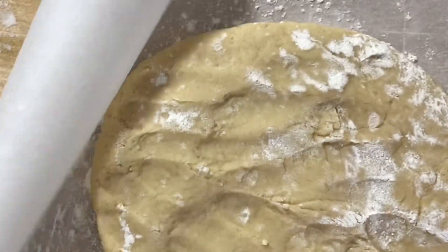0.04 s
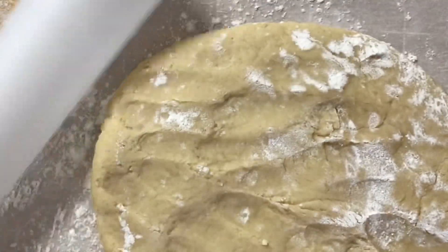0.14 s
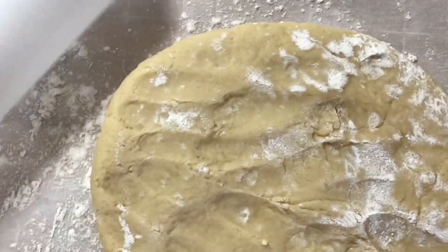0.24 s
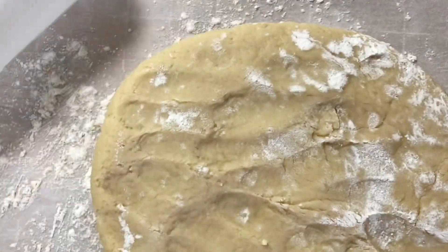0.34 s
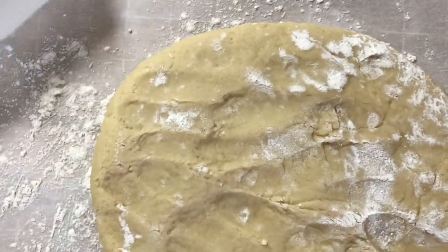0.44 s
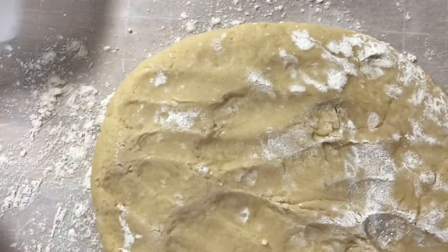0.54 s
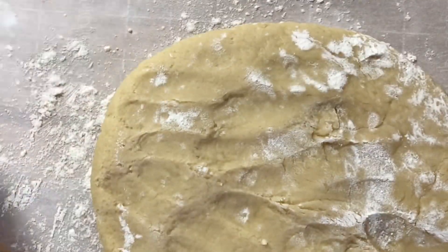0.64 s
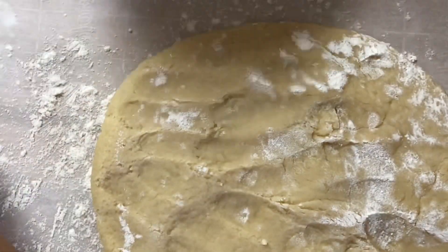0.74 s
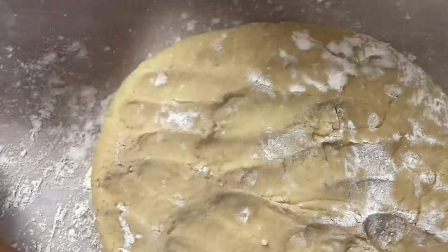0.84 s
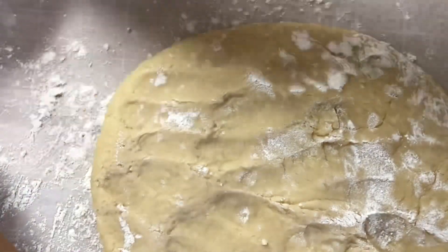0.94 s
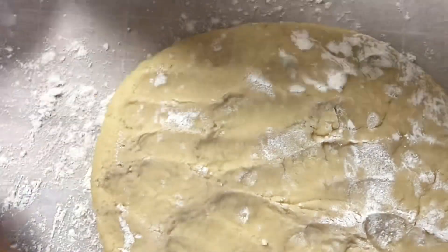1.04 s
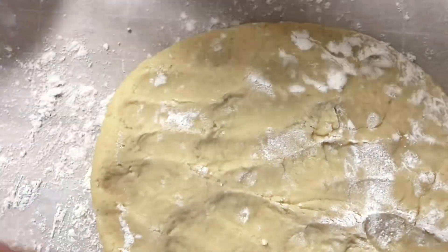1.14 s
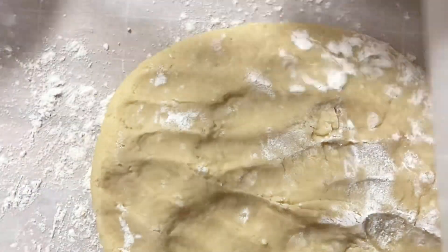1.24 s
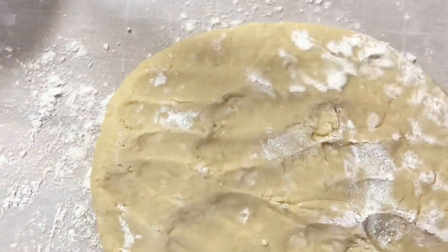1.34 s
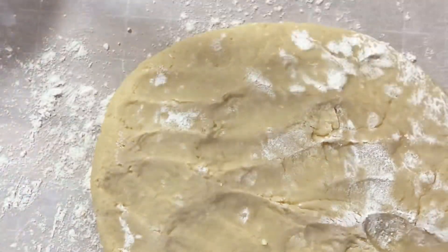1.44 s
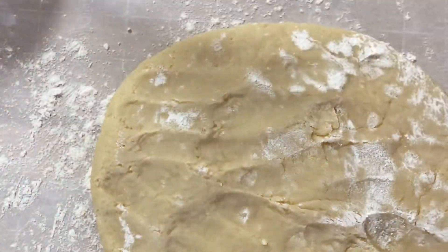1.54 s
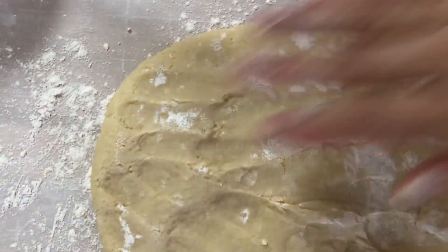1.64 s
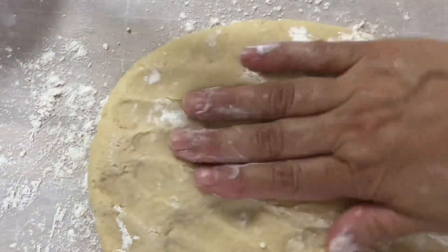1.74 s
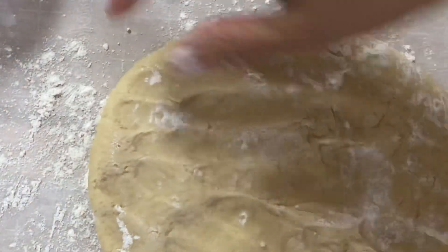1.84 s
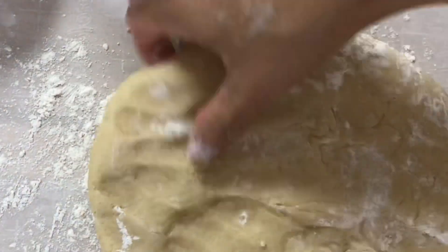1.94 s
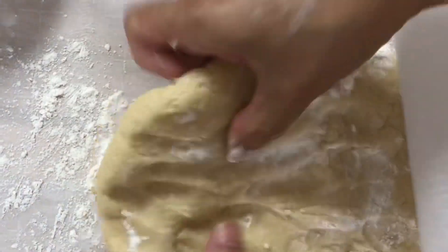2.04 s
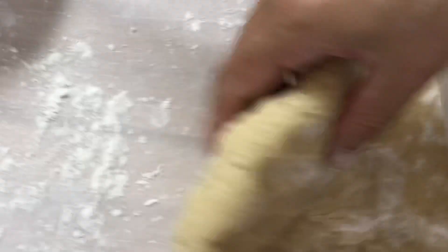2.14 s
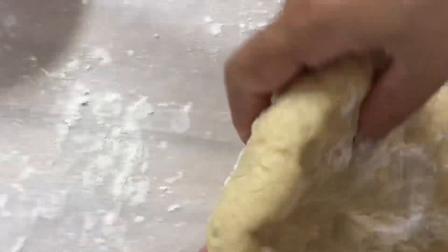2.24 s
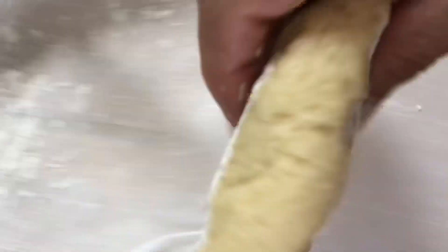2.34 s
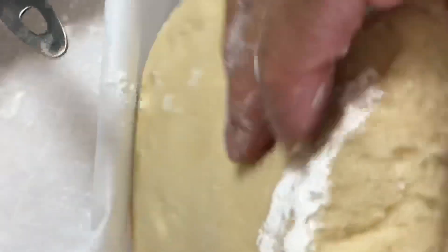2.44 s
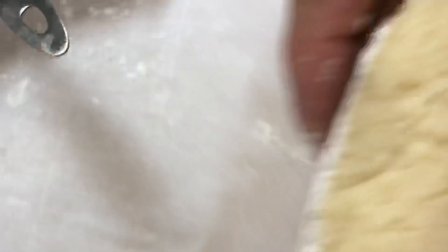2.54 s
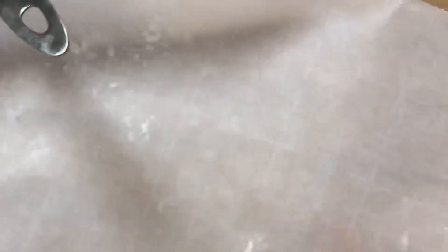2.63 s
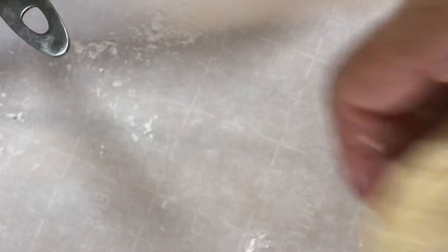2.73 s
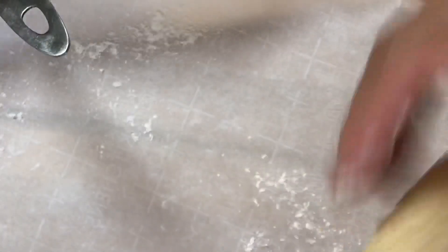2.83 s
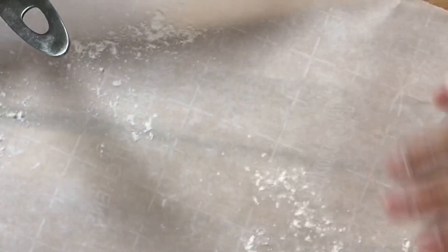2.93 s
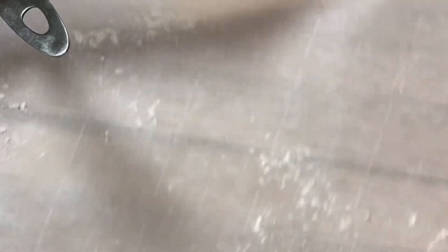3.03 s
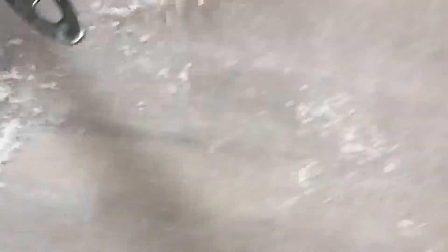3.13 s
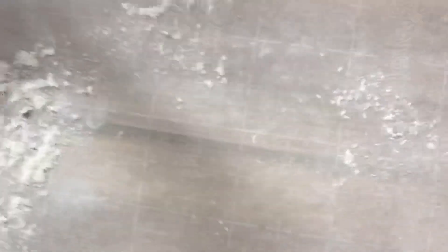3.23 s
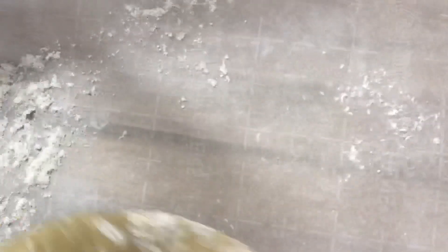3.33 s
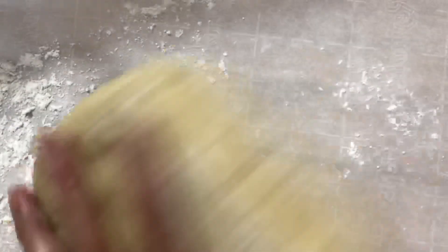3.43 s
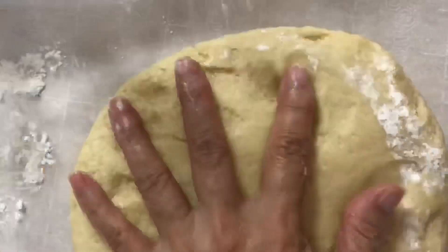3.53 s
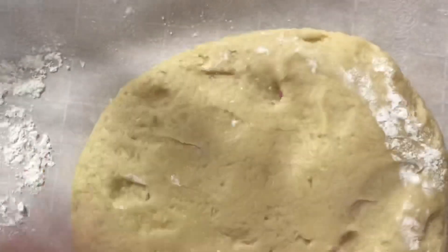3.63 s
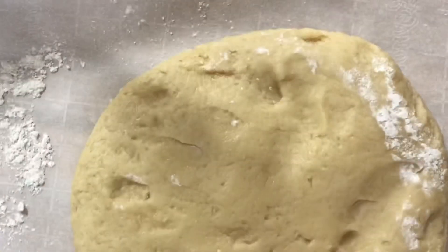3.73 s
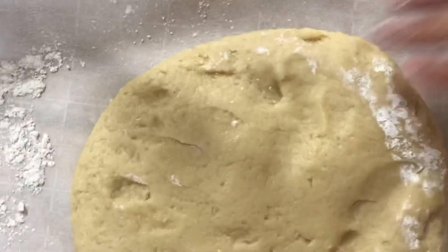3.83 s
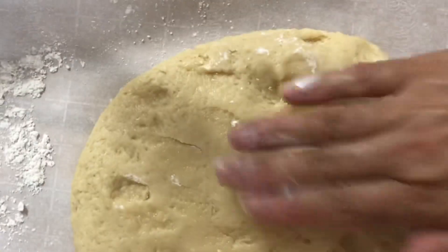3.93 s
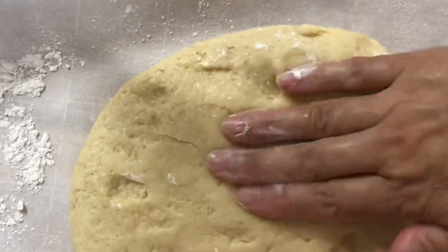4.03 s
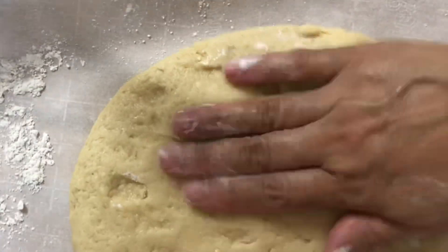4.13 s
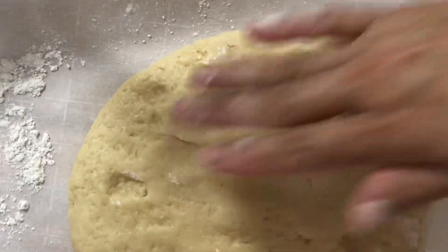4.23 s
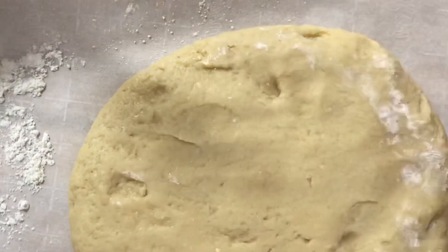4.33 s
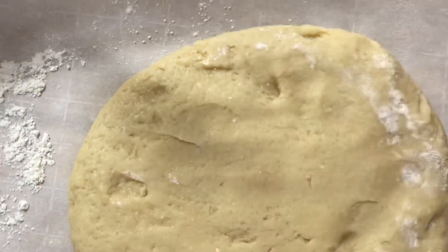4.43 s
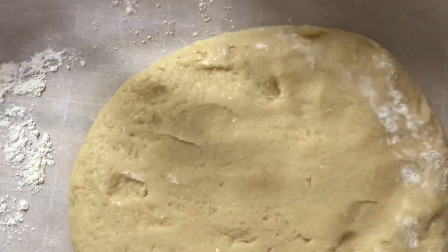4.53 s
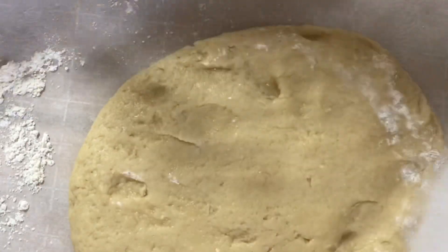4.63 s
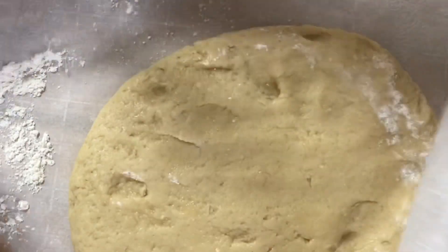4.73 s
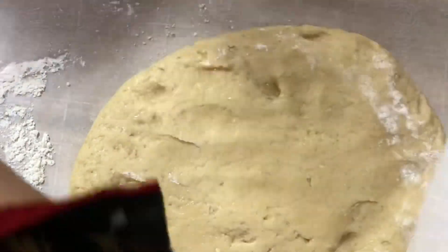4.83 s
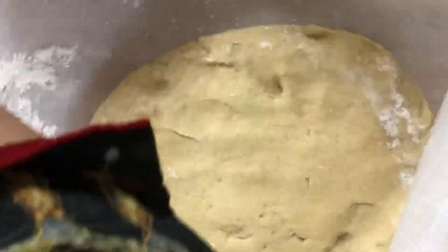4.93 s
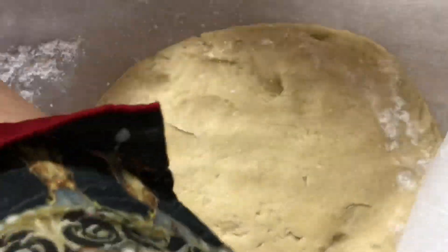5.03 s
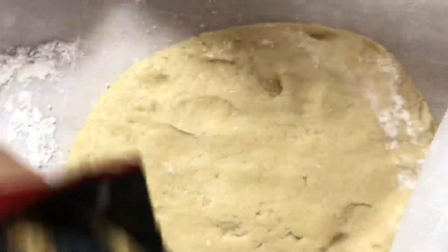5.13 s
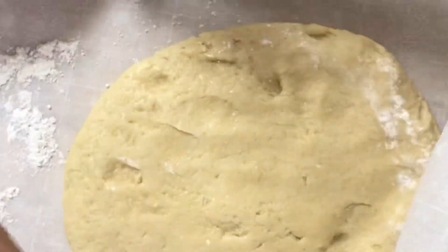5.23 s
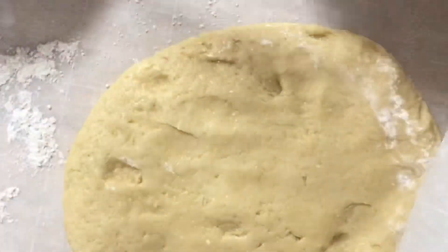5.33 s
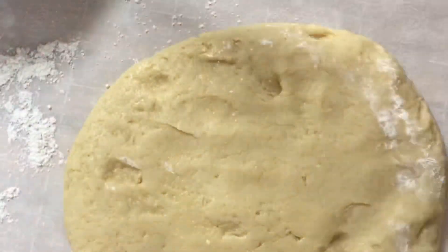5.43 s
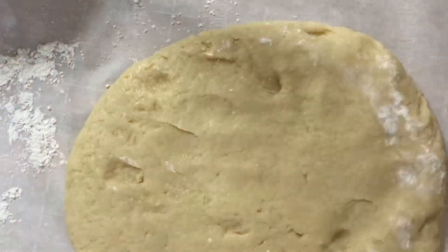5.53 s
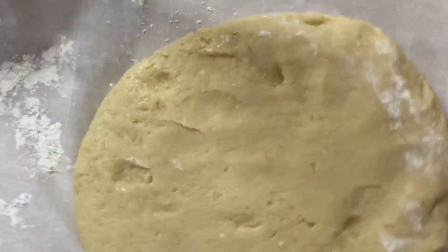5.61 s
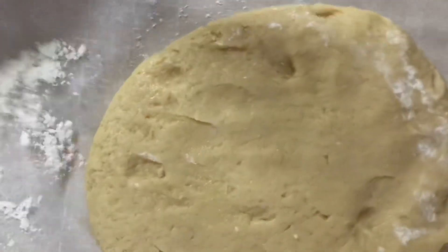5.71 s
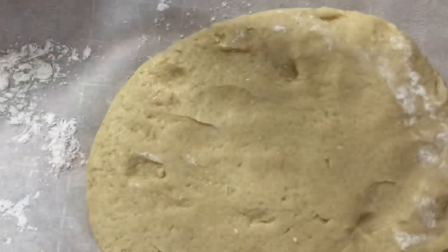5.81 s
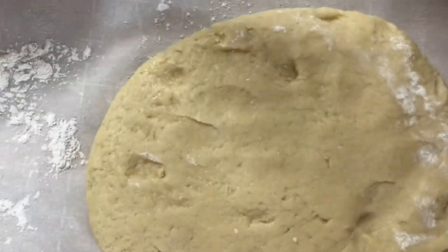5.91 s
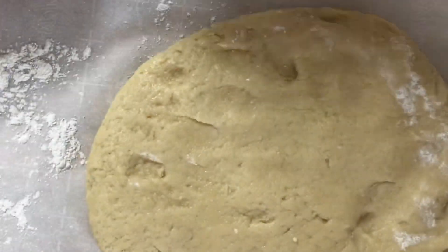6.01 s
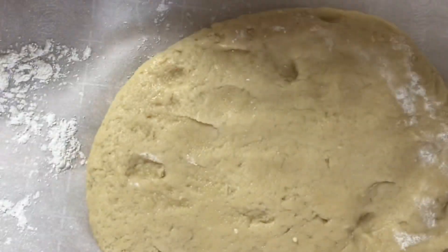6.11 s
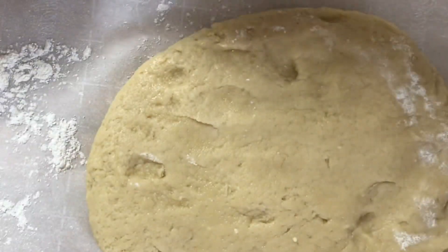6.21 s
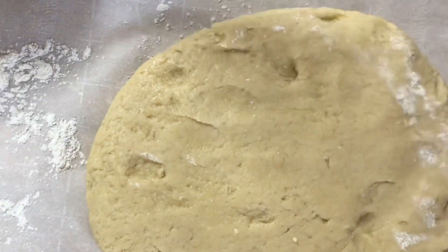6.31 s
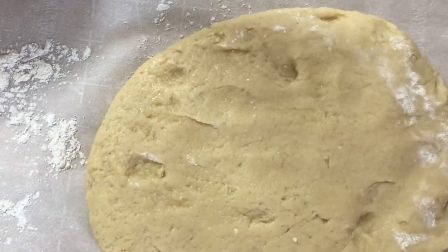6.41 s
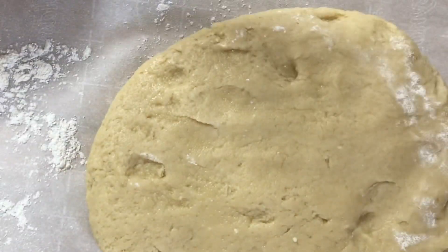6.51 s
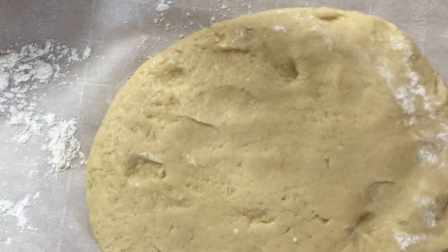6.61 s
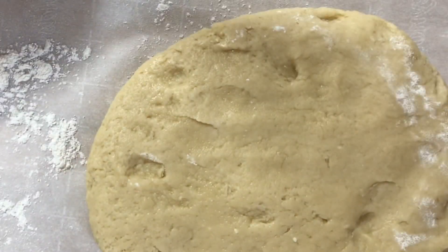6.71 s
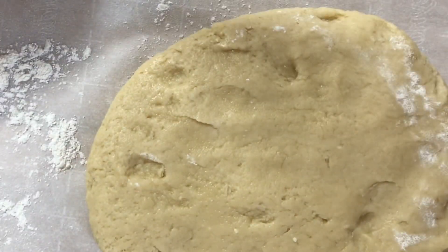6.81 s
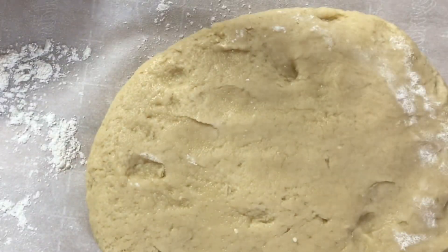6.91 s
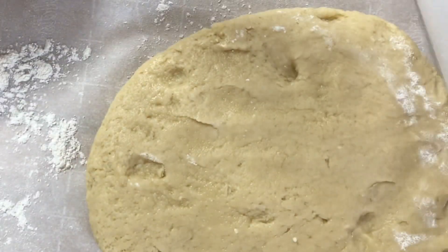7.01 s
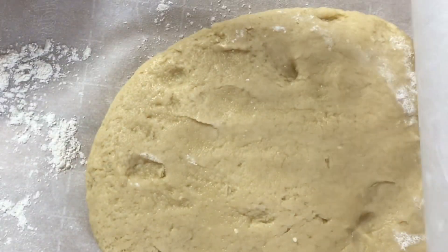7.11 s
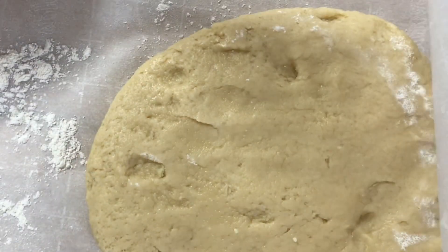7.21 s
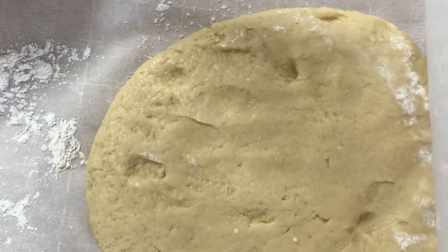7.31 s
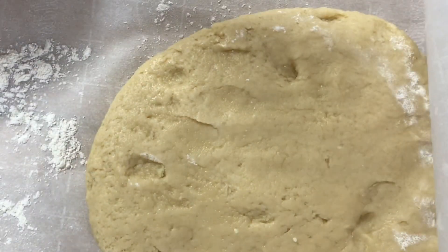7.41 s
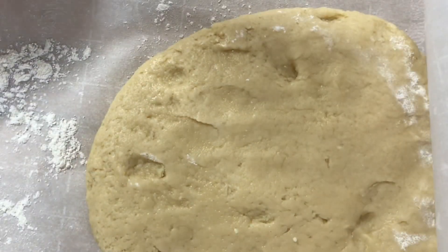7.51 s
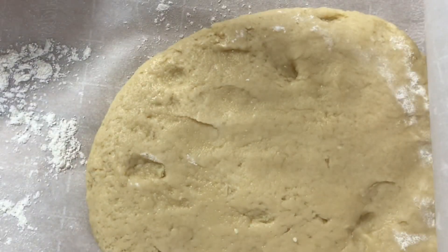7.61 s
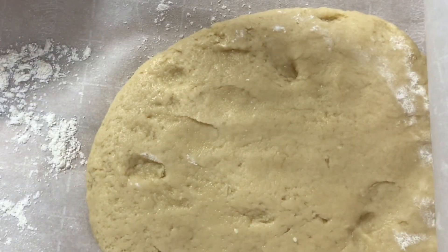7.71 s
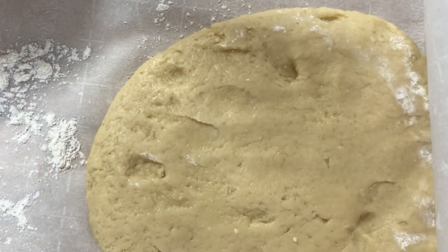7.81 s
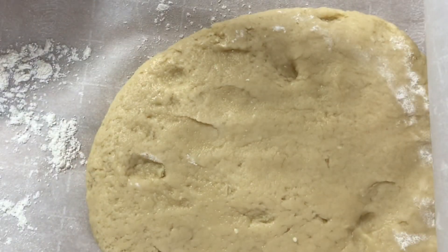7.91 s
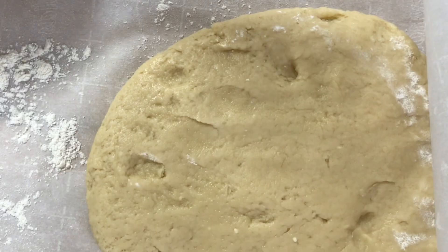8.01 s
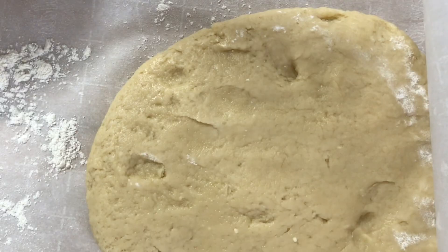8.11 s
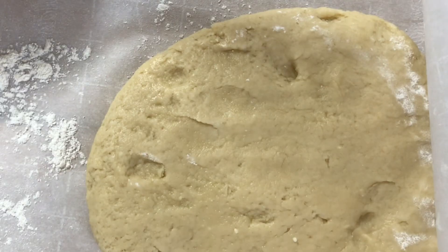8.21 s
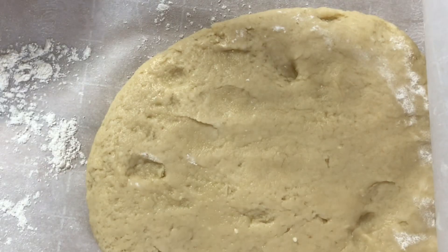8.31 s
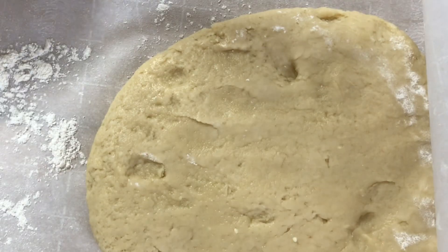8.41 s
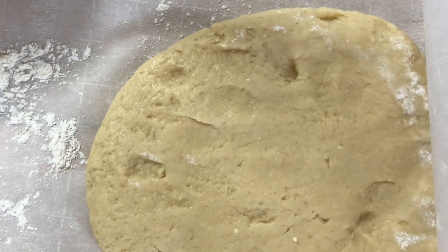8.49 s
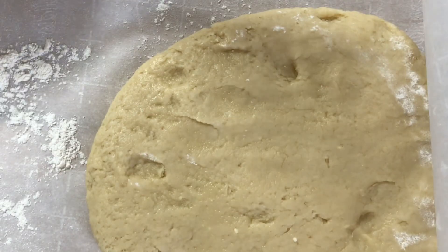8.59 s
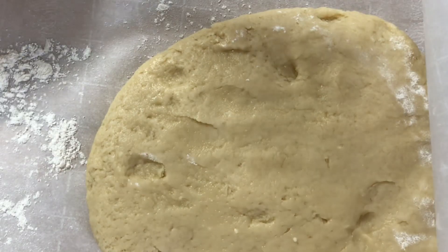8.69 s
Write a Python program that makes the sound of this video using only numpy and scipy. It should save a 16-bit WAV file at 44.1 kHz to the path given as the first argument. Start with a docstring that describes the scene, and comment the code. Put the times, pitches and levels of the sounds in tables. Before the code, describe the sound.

A close, dry kitchen scene over steady low fridge hum and airy wash. It opens with a soft hiss of a hand wiping flour, repeated near 0.5 s, with small paper ticks. At 0.9 s a hard, woody knock of a rolling pin on the worktop sets a thin metal cutter rattling brightly for an instant. Baking paper rustles from 1.2 s, with light bumps near 1.6 s, a floury wipe around 2 s, and the strongest crackling from 2.2 to 3.1 s as dough is lifted. At 3.5 s the dough slaps down with a sharp, crackly bang. Soft pats near 4.1 s and dense crinkles lead to another hard knock at 5.1 s. Paper snaps continue to about 6 s, then thin out with faint wipes at 6.4 and 7 s. Weak taps cluster at 7.7-7.9 s, then near quiet. A distant drone sinks and vanishes by 3.4 s.

```python
"""A kitchen worktop: a slab of dough is lifted, turned and slapped down on a crackling sheet of baking paper.
The paper is noise in three ranges, shaped by drags and pops, with short clusters of ticks for snapping creases.
Blows and a rattling metal cutter are sums of damped modes with noise; a hand wiping flour is band-passed noise.
Behind are a fridge (hum lines and shaped air noise), a sinking drone, perhaps a vehicle outside, and a rumble.
A phone listens close by: it rounds the peaks and limits the band."""
import sys
import numpy as np
from scipy import signal
from scipy.fft import rfft, irfft
from scipy.io import wavfile
from scipy.ndimage import uniform_filter1d

SR = 44100
rng = np.random.default_rng(int(sys.argv[2]) if len(sys.argv) > 2 else 0)


def generate_wav(signal):
    """Clip the signal to [-1, 1] and save it as 16-bit WAV at the path in sys.argv[1]."""
    frames = np.transpose(np.atleast_2d(signal))
    scaled = np.clip(frames, -1, 1) * 32767
    pcm = np.round(scaled).astype(np.int16)
    wavfile.write(sys.argv[1], SR, pcm)


N = 385875


def undb(db):
    """Decibels to amplitude: 20 dB is a factor of ten."""
    return 10 ** (np.asarray(db) / 20)


def level(x, db):
    """Scale a signal to a given rms level, the root of its mean power."""
    return x * undb(db) / np.sqrt(np.mean(x ** 2))


def band(x, lo_hz, hi_hz, order=2):
    """Band-pass filtering: a Butterworth response, flat between its edges."""
    edges_hz = [lo_hz, min(hi_hz, .49 * SR)]
    return signal.sosfilt(signal.butter(order, edges_hz, "bandpass", fs=SR, output="sos"), x)


def curves(table):
    """Linear interpolation in time of every column after the first, start_s."""
    s, *columns = np.transpose(np.vstack(table))
    return [np.interp(np.arange(N) / SR, s, c) for c in columns]


def add(out, s, x):
    """Superposition: sound x is summed into out from second s."""
    i = int(s * SR)
    out[i:i + len(x)] += x[:N - i]


def fade(t, t60):
    """Exponential decay that loses 60 dB in t60 seconds."""
    return np.exp(-np.log(1000) * t / t60)


def walk(rate):
    """Random modulation: straight slopes between random levels, rate of them per second; spread about 0.7."""
    k = int(SR / rate)
    held = np.repeat(rng.standard_normal(N // k + 1), k)
    return 0.9 * uniform_filter1d(held, k)[:N]


def ring(modes, t, stretch, chance):
    """Modal synthesis: damped sines, each struck a little differently; peak 1."""
    scatter_db, detune = 2, .004
    x = 0
    for (hz, db, t60), c in zip(modes, chance):
        sine = np.sin(2 * np.pi * hz * (1 + detune * c) * t)
        x = x + undb(db + scatter_db * c) * fade(t, stretch * t60) * sine
    return x / np.abs(x).max()


def stroke(s, rise, hold, fall, db):
    """Exponential growth and decay of one movement: its span, time since full strength, and level in dB."""
    ramp_db = 20  # climbed in one rise time, lost in one fall time
    n = slice(max(int((s - 3 * rise) * SR), 0), min(int((s + hold + 3 * fall) * SR), N))
    t = np.arange(n.start, n.stop) / SR - s
    rises_left = np.maximum(-t, 0) / max(rise, .003)
    falls_done = np.maximum(t - hold, 0) / max(fall, .003)
    return n, t, db - ramp_db * (rises_left + falls_done)


def sheet(x):
    """Radiation of paper in three ranges, joined without gaps, each at rms 1; the top end droops."""
    f = np.fft.rfftfreq(N, 1 / SR) + 1
    above = [1 / (1 + (hz / f) ** steep) for hz, steep in ((1600, 2.5), (3300, 4.64), (9000, 2.3))]
    low = np.abs(above[0] - above[1])
    mid = np.abs(above[1] - above[2])
    high = above[2] / (1 + (f / 17000) ** 4)
    return [level(irfft(rfft(x) * share, N), 0) for share in (low, mid, high)]


def patchy(x, depth_db):
    """Shape-dependent radiation: as the sheet changes shape, each narrow range swells and fades on its own."""
    f = np.fft.rfftfreq(N, 1 / SR) + 1
    above = [1] + [1 / (1 + (hz / f) ** 8) for hz in np.geomspace(1500, 13000, num=12)] + [0]
    spectrum = rfft(x)
    return sum(irfft(spectrum * (a - b), N) * undb(depth_db * walk(11)) for a, b in zip(above, above[1:]))


def drags():
    """Incoherent addition: overlapping drags add in power; returns the strength of the three paper ranges."""
    # the sheet is dragged or bent: full_from_s, rise_s, hold_s, fall_s, level_db,
    # low_db, high_db (below about 3.3 kHz and above 9 kHz, relative to the middle range)
    drag_table = [(0.226, 0.028, 0.0059, 0.058, -37.5, -14, -4), (0.814, 0.064, 0.05, .03, -47, -9, -6),
                  (0.97, 0.056, 0.36, 0.12, -57, 4.5, -1.5), (1.234, 0.086, 0.19, 0.16, -35, -5, -1.5),
                  (1.608, 0.023, 0.056, 0.037, -36, -6, -16), (1.697, .02, 0.063, 0.099, -44, -4.5, -12),
                  (1.87, .02, 0.31, 0.065, -48, -8, 5), (2.261, 0.084, 0.011, 0.21, -26, -4, -1),
                  (2.378, 0.039, .005, 0.16, -27.5, -4, -5), (2.498, 0.13, 0.059, 0.033, -29.5, -9, -6),
                  (2.583, 0.011, 0.012, 0.02, -35.5, -2, 7), (2.615, 0.022, .01, 0.22, -49.5, 1, 6),
                  (2.918, 0.011, 0.078, 0.058, -40.5, 0, -3), (3.039, 0.066, 0.042, 0.38, -32.5, -6, -2),
                  (3.33, 0.078, 0.016, 0.045, -51, -7, 0), (3.544, 0.027, .01, 0.3, -49, 0.5, -2.5),
                  (4.0, 0.44, 0.041, 0.047, -45.5, -1, -5), (4.114, 0.023, .012, 0.033, -34, -11, -4),
                  (4.16, .02, .01, 0.17, -51, 3, -3), (4.282, 0.012, .07, .02, -29, -1, -2),
                  (4.385, .02, .02, 0.2, -33, -8, 0), (4.481, 0.085, 0.092, 0.19, -39, -1.5, -2),
                  (4.679, 0.023, .005, 0.076, -33, -5, -1.5), (4.79, 0.017, 0.12, 0.15, -33.5, -1.5, -6),
                  (5.059, 0.022, 0.067, 0.044, -39.5, -5, -0.5), (5.18, 0.026, 0.061, 0.036, -47.5, 0, -4),
                  (5.347, 0.031, 0.024, .05, -50.5, 1, 9), (5.426, 0.078, 0.18, 0.081, -32.5, -3, -1),
                  (5.698, 0.065, 0.012, 0.094, -31, 0, 6.5), (5.809, .05, 0.07, 0.068, -48.5, 0.5, 10),
                  (5.922, 0.021, 0.0046, 0.021, -44, 5, 3), (5.95, .02, 0.034, 0.052, -50, -4, 3),
                  (6.06, 0.026, .005, 0.23, -47.5, -6, -3), (6.221, .05, .005, 0.089, -49, -1, 5),
                  (6.504, 0.038, 0.0045, 0.024, -45, -10, -7), (6.56, .03, 0.33, 0.089, -61.5, 0, 2.5),
                  (6.87, .06, .1, .3, -50, -4, 0), (7.225, .01, .003, 0.027, -61, -10, 0),
                  (7.787, 0.06, 0.047, .04, -55, 6, -12), (7.418, .06, 0.0045, 0.044, -61.5, 10.5, 3.5),
                  (7.897, 0.13, 0.0046, 0.058, -44, 0, -14)]
    # the sheet settling when nothing moves it: one level_db per range, low to high
    rest_db = [-74.5, -78, -85.5]
    thin_db_per_s = 28.5  # during its hold a drag loses its low range as the sheet tightens
    power = undb(2 * np.array(rest_db))[:, None] * np.ones(N)
    for s, rise, hold, fall, db, low_db, high_db in drag_table:
        n, t, now_db = stroke(s, rise, hold, fall, db)
        low = low_db - thin_db_per_s * np.clip(t, 0, hold)
        range_db = np.array([low, 0 * t, 0 * t + high_db])
        power[:, n] += undb(2 * (now_db + range_db))
    return np.sqrt(power)


def rustle():
    """Stick-slip friction: fibres tick densely, in uneven spurts; small creases pop singly."""
    pops_per_s, pop_t60_s = 65, 0.0093
    ticks = rng.standard_normal(N) * undb(1.1 * rng.exponential(size=N))
    spurts = undb(2.6 * walk(60) + 2.0 * walk(250))
    pops = (rng.random(N) < pops_per_s / SR) * undb(14 * rng.random(N))
    pops = np.convolve(pops, fade(np.arange(512) / SR, pop_t60_s))[:N]
    ranges = np.array(sheet(patchy(ticks, depth_db=5.5)))
    return level(spurts * (1 + pops), -2.5) * np.sum(drags() * ranges, axis=0)


def snaps():
    """Buckling: a crease gives way in a short cluster of ticks; the facet beside it rings briefly."""
    # creases snapping: start_s, level_db, ring_hz,
    # low_db, high_db (below about 3.3 kHz and above 9 kHz, relative to level_db)
    snap_table = [(0.226, -24, 2660, -7, -22), (0.492, -20.5, 8730, -16.5, -14),
                  (0.668, -24.5, 7600, -38, -14), (0.7305, -32.5, 2210, -21.5, -9),
                  (0.8092, -21.5, 8910, -34.5, -8), (0.8482, -38, 7300, -3, 3),
                  (0.876, -4.5, 2200, -12, -19), (0.894, -12, 7800, -20, -14), (0.988, -23, 2190, -22, -16),
                  (1.0574, -26.5, 2480, -18, -8), (1.0856, -25, 2370, -17, -16),
                  (1.114, -24.5, 2470, -14, -16), (1.1711, -17, 2050, -14, -21),
                  (1.2265, -15.5, 1760, -11.5, -18), (1.2757, -14, 5820, -22, -11),
                  (1.3146, -18, 5270, -7.5, -15), (1.339, -13, 5440, -21, -11),
                  (1.5401, -22.5, 7920, -22, -18), (1.573, -25.5, 8190, -15, -12),
                  (1.5984, -15, 2520, -20, -19), (1.6123, -7.5, 8140, -21.5, -20),
                  (1.6446, -17, 7590, -20, -11), (1.6763, -16, 2150, -12.5, -22),
                  (1.795, -20.5, 8810, -19, -16), (1.8524, -25, 10900, -15, -8),
                  (1.873, -23, 2340, -11, -20), (1.9302, -17.5, 2110, -9, -21),
                  (2.0754, -17.5, 11100, -16, -11), (2.215, -29.5, 3280, -20, -8),
                  (2.26, -8.5, 5300, -18, -13), (2.3777, -4, 2320, -20.5, -14),
                  (2.427, -13, 6370, -18, -15), (2.439, -23, 5820, -22, -15), (2.4834, -20, 7300, -17, -13),
                  (2.5024, -10.5, 8390, -16, -17), (2.5253, -5.5, 3570, -24, -15),
                  (2.5903, -9, 6600, -21, -7.5), (2.672, -19.5, 2200, -23, -16),
                  (2.807, -22, 3560, -24, -20), (2.9242, -15.5, 2680, -20, -14),
                  (2.9609, -5.5, 5270, -24, -25), (3.0187, -26, 5870, -23, -18),
                  (3.044, -15, 10600, -23, -13), (3.097, -20.5, 8200, -33, -12),
                  (3.3102, -20.5, 2340, -13, -12), (3.332, -15.5, 6980, -22, -15),
                  (3.3541, -16, 9150, -22, -19), (3.4771, 1.5, 4060, -10, -8),
                  (3.5923, -14, 3370, -17, -16), (3.6955, -29.5, 11300, -25, -14),
                  (3.746, -47, 7400, -27, 7), (3.779, -15, 5100, -16, -10), (3.8764, -21.5, 1790, -26, -26),
                  (3.9058, -21, 3640, -15, -19), (3.984, -34, 3620, -6, -7),
                  (4.0137, -24.5, 8640, -12, -10), (4.0307, -15, 2240, -19, -20),
                  (4.1117, -16.5, 2140, -5.5, -14), (4.2648, -26.5, 2350, -8.5, -18),
                  (4.2883, -13, 2480, -8, -18), (4.317, -9, 3100, -21, -14), (4.3663, -8.5, 7710, -36, -9),
                  (4.3933, -8, 9200, -20, -11.5), (4.5132, -14.5, 9510, -22, -14),
                  (4.5497, -22.5, 4530, -10, -19), (4.6714, -19, 3400, -20, -15),
                  (4.7453, -21, 2160, -16, -16), (4.784, -22, 2100, -15, -14),
                  (4.812, -12.5, 3510, -19.5, -16), (4.843, -19, 6200, -21, -9),
                  (4.887, -11, 5300, -20.5, -13), (5.0264, -30.5, 2160, -9.5, -5),
                  (5.0571, -10.5, 11100, -18, -6.5), (5.0824, -18.5, 8000, -9, -10),
                  (5.106, -8.5, 2560, -8, -26.5), (5.3318, -23, 2310, -10.5, -10),
                  (5.405, -25, 5850, -14, -8), (5.422, -12.5, 5100, -36, -17),
                  (5.5001, -28, 11600, -13, -8), (5.533, -3.5, 8000, -16.5, -14),
                  (5.6078, -18, 11300, -20, -10), (5.685, -13, 10800, -31, -11),
                  (5.7803, -22, 4960, -14, -20), (5.7973, -14, 6660, -19, -11),
                  (5.8383, -14, 8000, -14, -10), (5.9164, -20.5, 11400, -26, -10),
                  (5.985, -24.5, 10400, -21, -11), (6.043, -38, 11100, -22, -8),
                  (6.0633, -21, 8650, -18, -10), (6.22, -26.5, 7300, -15, -3),
                  (6.2756, -22.5, 7690, -26, -9), (6.3539, -20, 5500, -22.5, -21),
                  (6.507, -21.5, 8920, -26, -11), (6.5847, -32, 5470, -21, -7.5),
                  (6.6171, -25.5, 6870, -18, -12), (6.71, -23, 5460, -17, -8), (6.821, -29, 2750, -13, -13),
                  (6.839, -15.5, 7500, -23, -19), (6.8741, -13, 8000, -22, -20),
                  (6.944, -23, 3550, -23, -17), (6.981, -25.5, 9750, -18, -8),
                  (7.3103, -21, 1970, -15, -12), (7.7679, -43, 2190, -4, -29),
                  (7.781, -28.5, 3030, -7, -34), (7.8064, -22, 2520, -14, -29),
                  (7.8567, -31, 2280, -7, -24), (7.8825, -31, 2170, -6, -27),
                  (8.039, -23.5, 2760, -14, -16)]
    rise_t60_s, snap_t60_s = .0045, 0.015
    first_tick_db, first_tick_t60_s = -4.5, 0.0023
    facet_db = 3
    low, mid, high = sheet(rng.standard_normal(N) * undb(2.8 * rng.exponential(size=N)))
    out, t = np.zeros(N), np.arange(4096) / SR
    cluster = (1 - fade(t, rise_t60_s)) * fade(t, snap_t60_s)
    envelope = cluster + undb(first_tick_db) * fade(t, first_tick_t60_s)
    for s, db, hz, low_db, high_db in snap_table:
        n = slice(int(s * SR), int(s * SR) + len(t))
        x = undb(low_db) * low[n] + undb(-15.0) * mid[n] + undb(high_db) * high[n]
        x = x * envelope[:len(x)]
        facet = undb(facet_db) * band(x, hz / 1.042, hz * 1.025, order=1)
        add(out, s, undb(db + 2.0) * (x + facet))
    return out


def knocks():
    """Impact excitation: a blow rings worktop and pin modes near where it lands; dough thuds, air cracks."""
    # blows: start_s, level_db, then thud_db, worktop_db, pin_db, crack_db (relative to level_db),
    # worktop_centre_hz, pin_centre_hz, ring_stretch (factor on decay times)
    knock_table = [(0.876, 0, -60, -13.5, -5.5, -23, 635, 1410, 0.68),
                   (1.598, -31, -20, -14, -10, -5, 452, 2500, 1),
                   (1.677, -26, -15, -5.5, -32, -19, 344, 2080, 0.79),
                   (3.475, -6.5, -19, -8.5, -5.5, -1.5, 248, 2150, 0.64),
                   (3.502, -21, -26, -4.5, -16, -27, 377, 2640, 0.88),
                   (3.925, -37.5, -13, -5, -25, -1, 248, 1840, 0.38),
                   (4.11, -22, -25, -17, -3, -20, 277, 2190, 0.35),
                   (4.12, -22, -28, -40, 2.5, -15, 474, 2200, 0.33),
                   (5.106, -3.5, -63, -8.5, -7.5, -40, 603, 1350, 0.57),
                   (5.124, -22.5, -41, -4, 2.5, -6, 283, 1350, 0.92),
                   (7.711, -32.5, -24.5, 0.5, 0.5, -24, 353, 930, 1),
                   (7.774, -33, -19, -3, -15, -29, 336, 902, 1),
                   (7.783, -26, -15, -9, -12, -27, 546, 1720, 1),
                   (7.859, -34, -28, -7, -5, -5, 342, 1460, 1),
                   (7.882, -26, -31, -9, -2, -15, 328, 2040, 0.79),
                   (7.91, -32.5, -11, -3, -6, -25, 358, 1870, 0.98)]
    # modes of the worktop: pitch_hz, level_db (relative), t60_s (before stretch)
    worktop_modes = [(203, -5, 0.046), (265, -5.5, 0.23), (300, -2.5, 0.07), (354.5, -3.5, 0.2),
                     (498, -3, .1), (593, -2.5, 0.036), (606, -1.5, 0.064), (843, -14.5, 0.027)]
    # modes of the rolling pin: pitch_hz, level_db (relative), t60_s (before stretch)
    pin_modes = [(1054, -9.5, .12), (1270, -12, .08), (1316, 1.5, .09), (1426, 1.5, 0.027),
                 (1993, 8, 0.027), (2387, 5.5, 0.1), (2430, -10.5, 0.042)]
    # the worktop is loudest in the first moments of contact, the more so the harder the blow
    front_db, front_db_per_db, front_t60_s = 7, .4, .022
    out, t = np.zeros(N), np.arange(16384) / SR
    chance = rng.standard_normal((len(knock_table), 2, len(pin_modes) + len(worktop_modes)))
    for knock, c in zip(knock_table, chance):
        s, db, thud_db, top_db, pin_db, crack_db, top_hz, pin_hz, stretch = knock
        noise = rng.standard_normal(len(t))
        # many small modes blur into a fading rumble
        blur = level(band(noise, 240, 1100), -10.5) * fade(t, 0.25 * stretch)
        top = band(ring(worktop_modes, t, stretch, c[0]) + blur, 160, 5000, order=3)
        top = band(top, top_hz / 2.0, top_hz * 1.53, order=1)
        top = top * (1 + undb(front_db + front_db_per_db * db) * fade(t, front_t60_s))
        # the blur of the pin fades fast, then slowly
        two_fades = fade(t, 0.086 * stretch) + undb(-7) * fade(t, 0.31 * stretch)
        pin = ring(pin_modes, t, stretch, c[1]) + level(band(noise, 1100, 4500), -7.5) * two_fades
        near_centre = band(band(pin, 500, 8000), pin_hz / 1.2, pin_hz * 1.335, order=1)
        pin = near_centre + undb(-17) * band(pin, 900, 8200)
        thud = np.sin(2 * np.pi * 105 * t) * (1 - fade(t, .012)) * fade(t, 0.075)
        crack = level(band(noise, 3000, 16000), crack_db) * (fade(t, 0.032) + undb(-20.0) * fade(t, 0.17))
        body = undb(thud_db + 4.5) * thud + undb(top_db + 6.8) * top + undb(pin_db + 2.5) * pin
        add(out, s, undb(db) * (body + crack))
    return out


def cutter():
    """Modal ringing of thin metal, high at every hop, roughened as it chatters on the worktop."""
    # the cutter hops on the worktop: start_s, level_db
    hops = [(0.8934, -0.5), (0.9004, -10), (0.9164, -15), (0.9314, -21), (5.1302, -21)]
    # modes of the cutter: pitch_hz, level_db (relative), t60_s (capped and shortened below)
    cutter_modes = [(4880, -2, 0.1), (5560, -18, 0.17), (5860, -2, 0.086), (7460, -2, 0.13),
                    (7900, 3, 0.064), (10000, -26.5, 0.19), (9776, -25, 0.6), (10800, -24, 0.29),
                    (12000, -13, 0.11), (13300, 4.5, 0.12), (12600, -5.5, 0.12), (13000, 2, 0.095),
                    (13360, -21, 0.12), (14400, -2.5, 0.051)]
    out, t = np.zeros(N), np.arange(16384) / SR
    modes = [(hz, db, min(t60, .13)) for hz, db, t60 in cutter_modes]
    for (s, db), c in zip(hops, rng.standard_normal((len(hops), len(modes)))):
        chatter = 1.0 + level(band(rng.standard_normal(len(t)), 40, 500), 4.6)
        scrape = level(band(rng.standard_normal(len(t)), 4000, 16000), -16.0) * fade(t, .06)
        add(out, s, undb(db - 3.0) * (ring(modes, t, 0.51, c) * chatter + scrape))
    return out


def wipes():
    """Granular friction: fine flour under the palm hisses smoothly, strongest just above its lower edge."""
    # a hand wipes flour over pin or dough: full_from_s, rise_s, hold_s, fall_s, level_db,
    # lower_edge_hz, lift_db (extra near the edge, relative to the hiss)
    wipe_table = [(0.0, .01, 0.11, 0.19, -36.5, 1780, -9), (0.483, 0.17, 0.044, 0.13, -35.5, 4400, -31),
                  (1.931, 0.13, 0.26, 0.035, -39, 1790, -9), (6.39, 0.12, 0.032, 0.12, -45.5, 4800, -13),
                  (7.038, 0.13, 0.034, 0.24, -49.5, 1970, 1)]
    waver_db = 2
    out = np.zeros(N)
    noise = rng.standard_normal(N) * undb(waver_db * walk(30) + 1.4 * rng.exponential(size=N))
    for s, rise, hold, fall, db, lo_hz, lift_db in wipe_table:
        n, t, now_db = stroke(s, rise, hold, fall, db)
        lift = level(band(noise[n], lo_hz, 2.13 * lo_hz), lift_db)
        hiss = level(band(noise[n], lo_hz, 15000), 0) + lift
        out[n] += undb(now_db) * level(hiss, 0)
    return out


def fridge():
    """Tonal and broadband machine noise: wavering lines of compressor hum over a broad wash of air."""
    # lines of compressor hum: pitch_hz, level_db
    hum_lines = [(145.3, -65), (242.2, -65.5), (355.3, -65), (479.1, -63), (527.6, -66.5), (586.8, -65.5),
                 (656.8, -66), (699.8, -70), (748.3, -71.5), (963.6, -76), (1534, -75.5), (1825, -71.5)]
    # spectrum of the air noise: frequency_hz, density_db (relative, per Hz)
    air_spectrum = [(18, -47.5), (30, -33), (82, -8), (190, -5), (235, -2.5), (283, -5.5), (359, 0.5),
                    (420, -4), (659, -3.5), (881, -11), (1800, -13.5), (3760, -27), (11700, -36),
                    (15200, -39), (16500, -59)]
    # course of the whole fridge: start_s, level_db (only the difference from the last row counts)
    fridge_course = [(0.0, -52), (5.8, -52), (7.8, -53), (8.15, -54.5), (8.75, -54.5)]
    hum_waver_db, air_db = 2.5, -53.5
    t = np.arange(N) / SR
    hum = np.zeros(N)
    for line_hz, line_db in hum_lines:
        amplitude = 2 ** .5 * undb(line_db + hum_waver_db * walk(9))  # root 2: level_db is rms
        hum += amplitude * np.sin(2 * np.pi * (line_hz * t + 0.15 * walk(6) + rng.random()))
    f = np.maximum(np.fft.rfftfreq(N, 1 / SR), 1)
    hz, db = np.transpose(air_spectrum)
    density = undb(np.interp(np.log(f), np.log(hz), db))
    air = irfft(rfft(rng.standard_normal(N)) * density, N)
    swell, = curves(fridge_course)
    return (hum + level(air, air_db)) * undb(swell - swell[-1])


def street():
    """Frequency modulation: a sinking, wavering drone that dies away, over a randomly swelling low rumble."""
    # the drone, perhaps a vehicle outside: start_s, pitch_hz, level_db
    drone_course = [(0.0, 193.5, -51), (0.47, 190, -74), (0.76, 167.5, -59), (1.25, 143, -59.5),
                    (1.93, 134.3, -59), (2.42, 117.8, -57), (2.98, 112, -66), (3.4, 97, -69)]
    rumble_db, rumble_swell_db = -60, 4
    hz, db = curves(drone_course)
    gone = np.clip((drone_course[-1][0] - np.arange(N) / SR) / 0.33, 0, 1)
    cycles = np.cumsum(hz) / SR + 0.096 * walk(15)
    drone = 2 ** .5 * np.sin(2 * np.pi * cycles) * undb(db + 3.4 * walk(10.1)) * gone
    rumble = band(rng.standard_normal(N), 85, 120) * undb(rumble_swell_db * walk(4))
    return drone + level(rumble, rumble_db)


def kitchen(near):
    """Reverberation: convolution with decaying noise of unit energy, after a 4 ms gap."""
    t60_s, room_db = 0.16, -18.5
    t = np.arange(int(.5 * SR)) / SR
    echo = band(rng.standard_normal(len(t)), 130, 5000, order=1) * fade(t, t60_s) * (t > .004)
    return undb(room_db) * signal.fftconvolve(near, echo / np.sqrt(np.sum(echo ** 2)))[:N]


def scene():
    """Superposition of the near sources, their reverberation and the background, in one channel."""
    near = rustle() + wipes() + snaps() + knocks() + cutter()
    return (near + kitchen(near) + fridge() + street())[None]


def record(dry):
    """Saturation and band limiting: the phone rounds the loudest peaks, drops deep bass and cuts the top."""
    top_hz = 15900
    rounded = 0.92 * np.tanh(dry)
    x = signal.sosfilt(signal.butter(3, 60, "highpass", fs=SR, output="sos"), rounded)
    return signal.sosfilt(signal.ellip(10, .2, 85, top_hz, fs=SR, output="sos"), x)


dry = scene()
out = record(dry)
generate_wav(out)
```